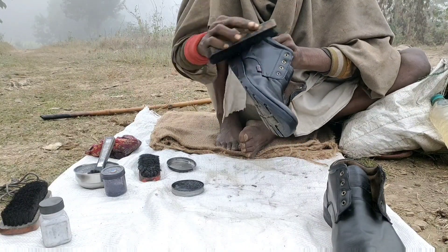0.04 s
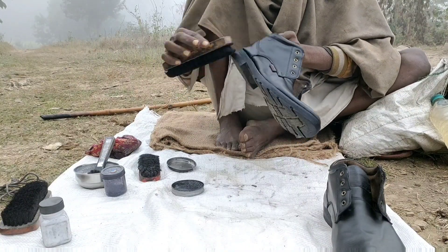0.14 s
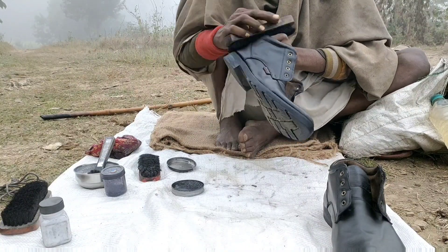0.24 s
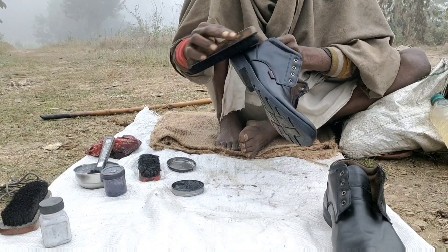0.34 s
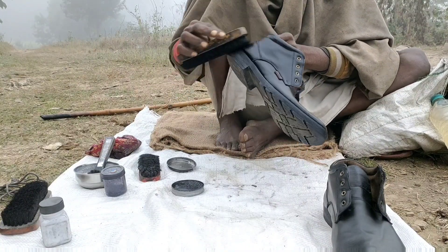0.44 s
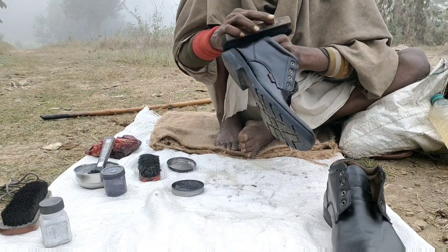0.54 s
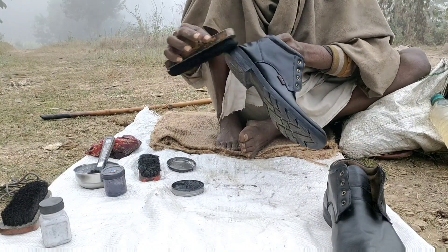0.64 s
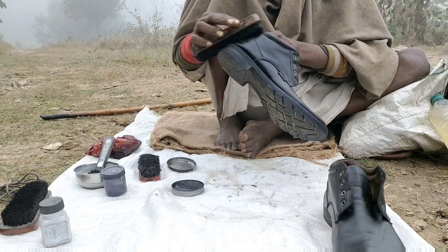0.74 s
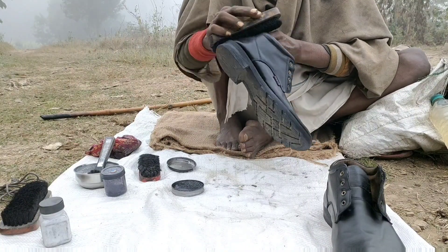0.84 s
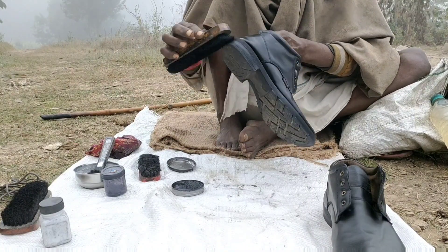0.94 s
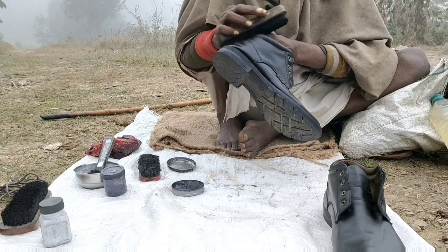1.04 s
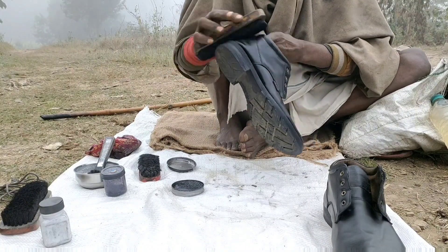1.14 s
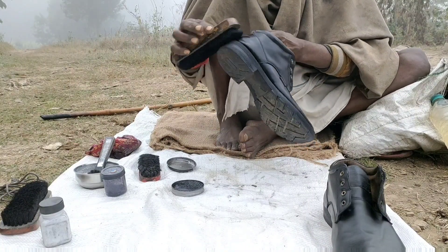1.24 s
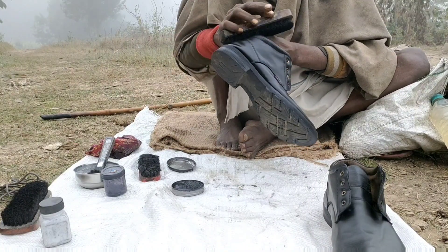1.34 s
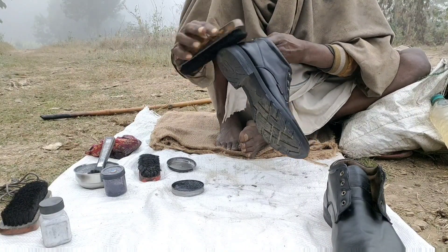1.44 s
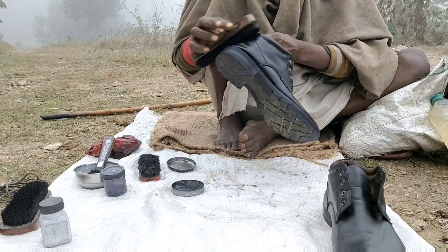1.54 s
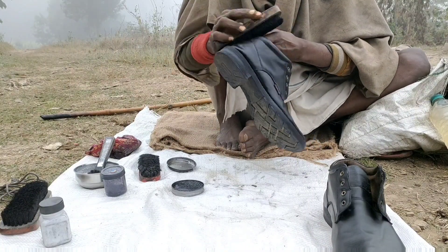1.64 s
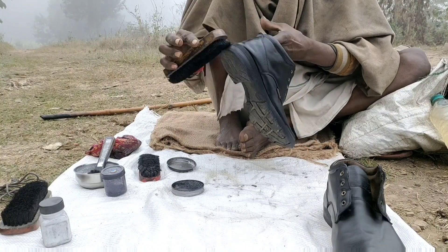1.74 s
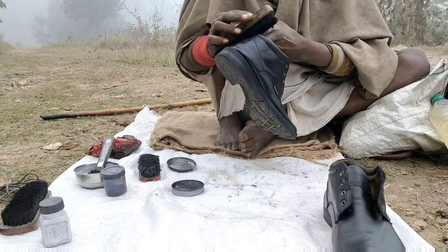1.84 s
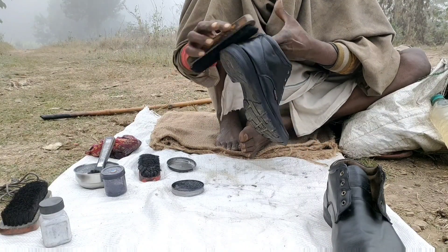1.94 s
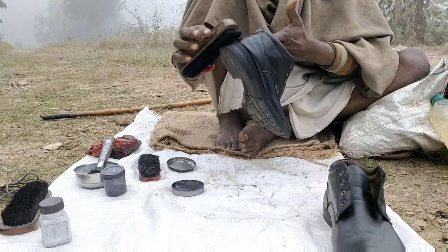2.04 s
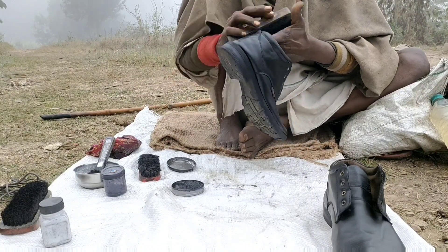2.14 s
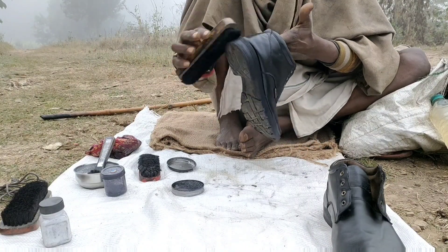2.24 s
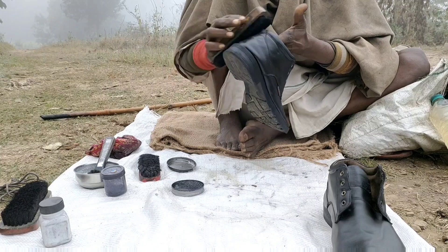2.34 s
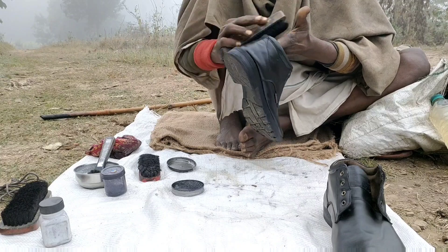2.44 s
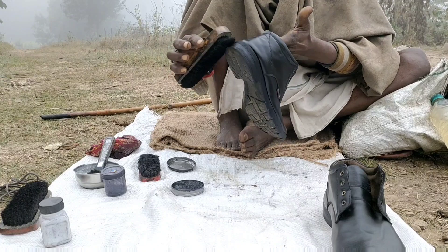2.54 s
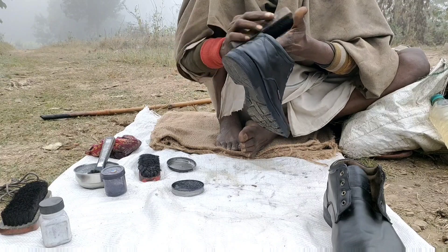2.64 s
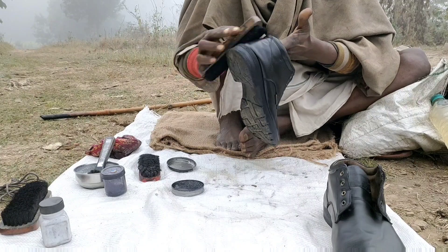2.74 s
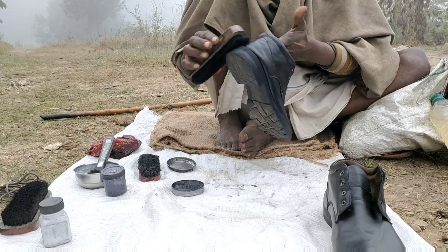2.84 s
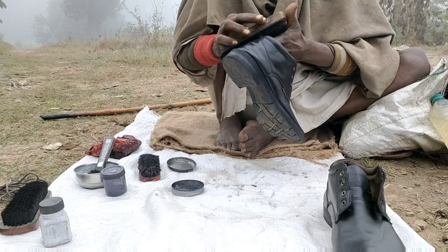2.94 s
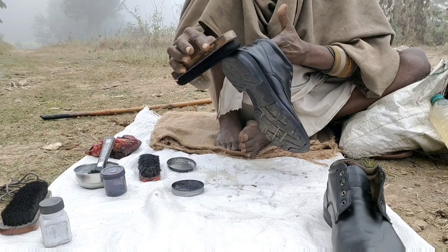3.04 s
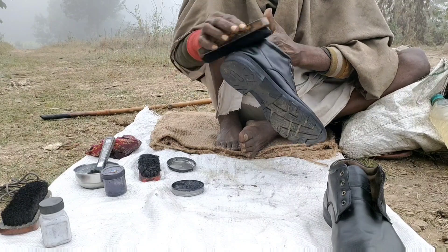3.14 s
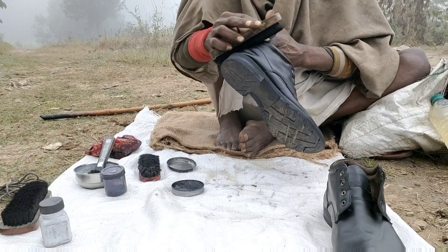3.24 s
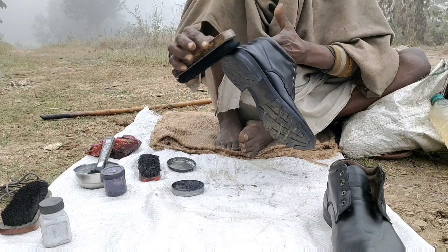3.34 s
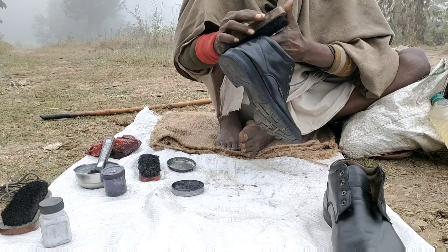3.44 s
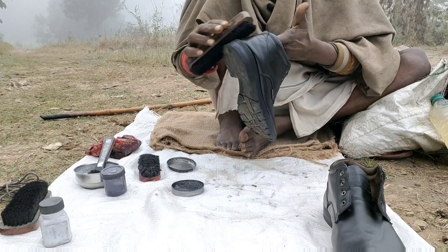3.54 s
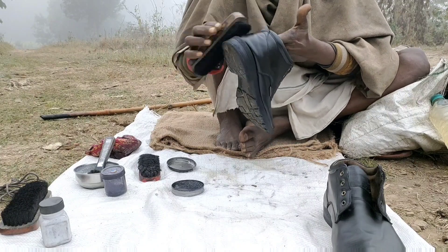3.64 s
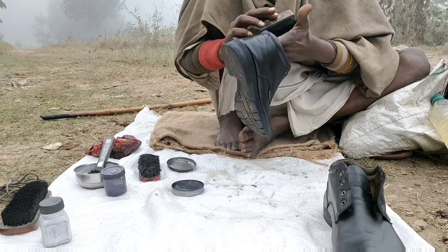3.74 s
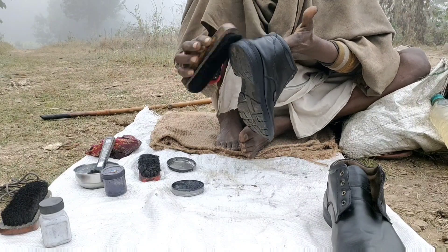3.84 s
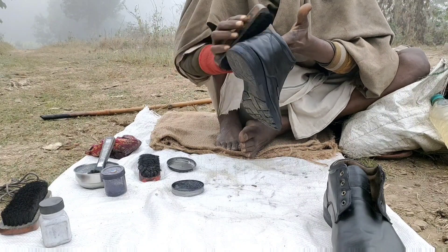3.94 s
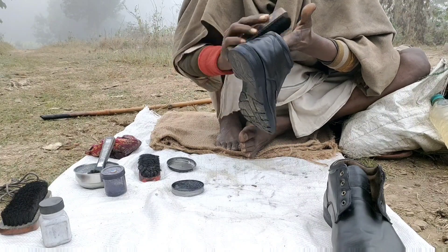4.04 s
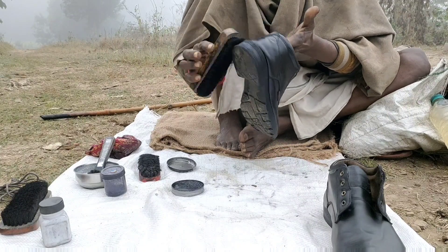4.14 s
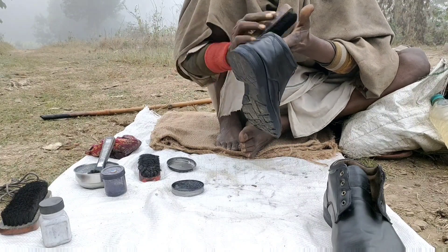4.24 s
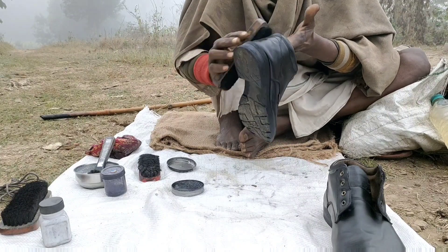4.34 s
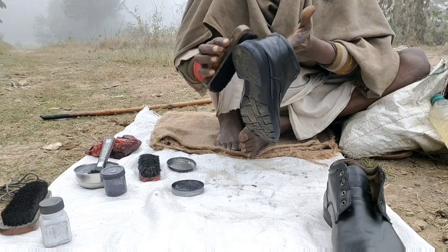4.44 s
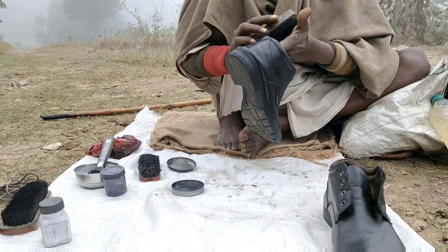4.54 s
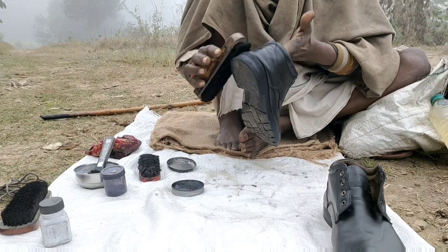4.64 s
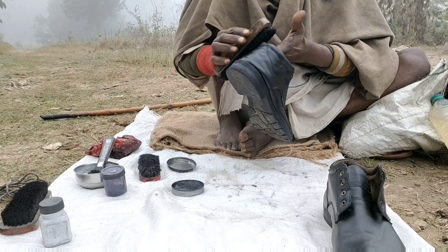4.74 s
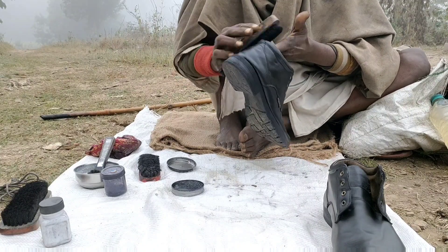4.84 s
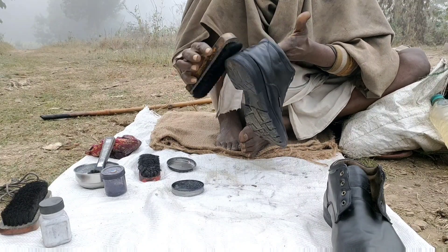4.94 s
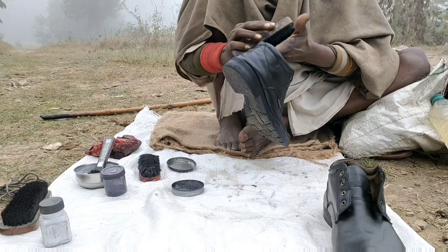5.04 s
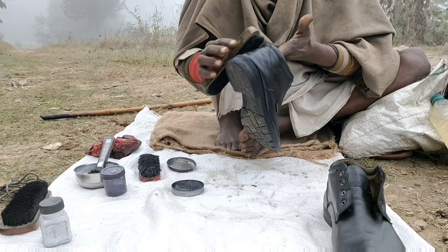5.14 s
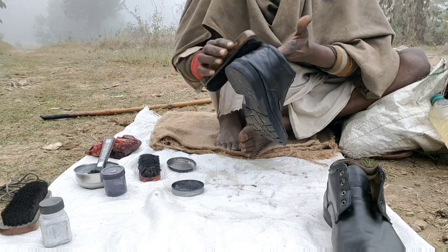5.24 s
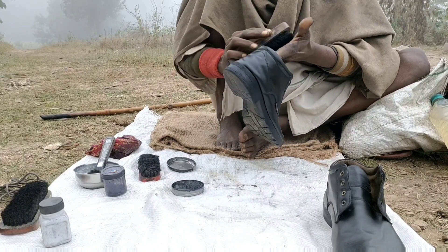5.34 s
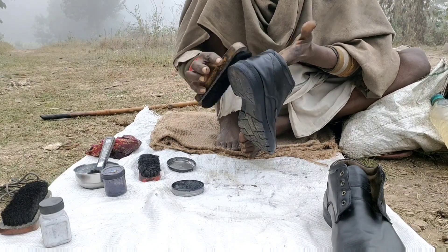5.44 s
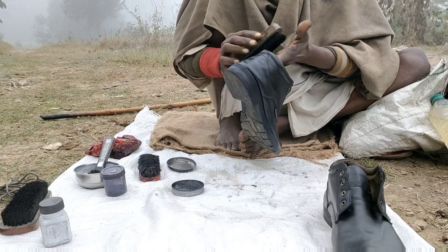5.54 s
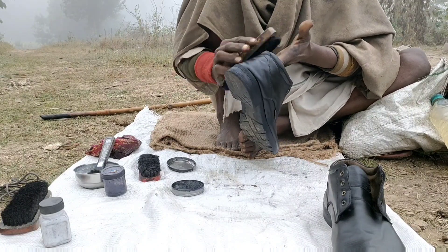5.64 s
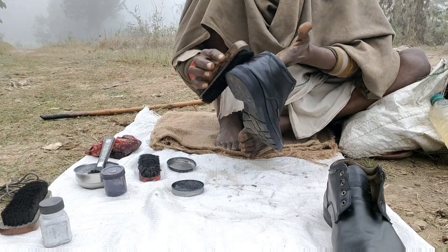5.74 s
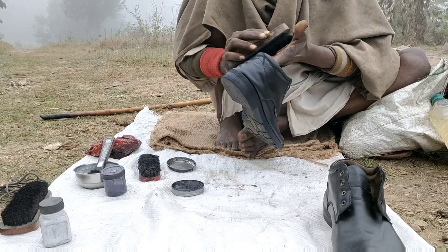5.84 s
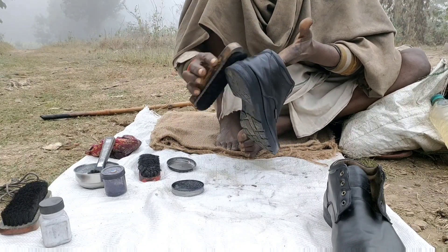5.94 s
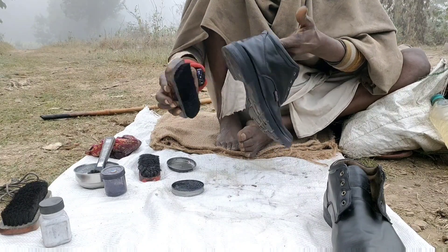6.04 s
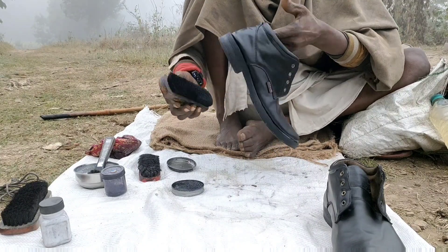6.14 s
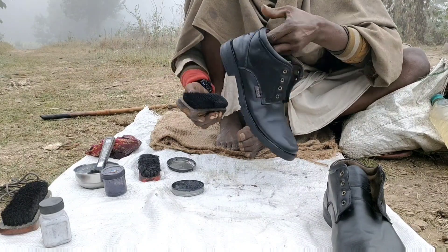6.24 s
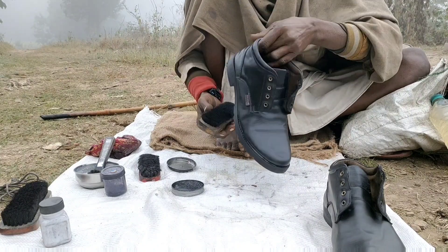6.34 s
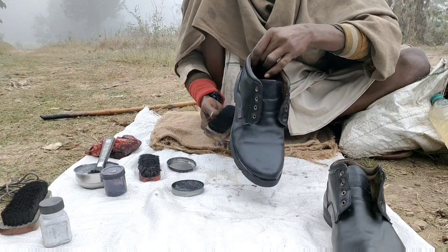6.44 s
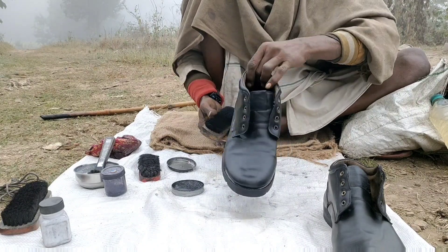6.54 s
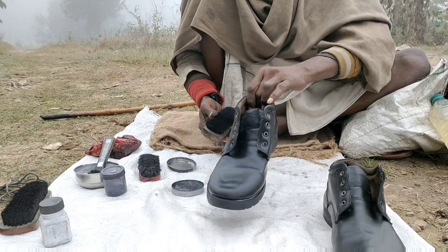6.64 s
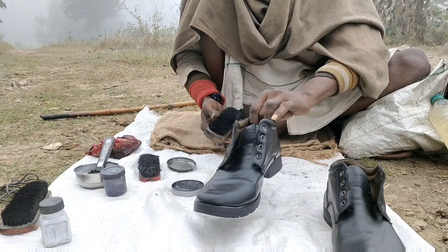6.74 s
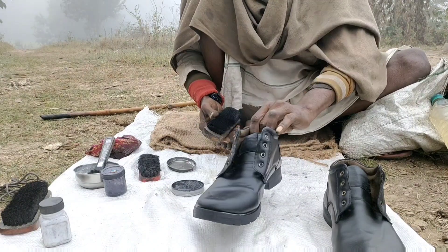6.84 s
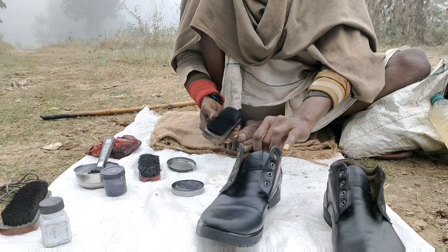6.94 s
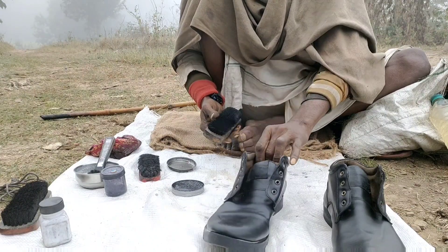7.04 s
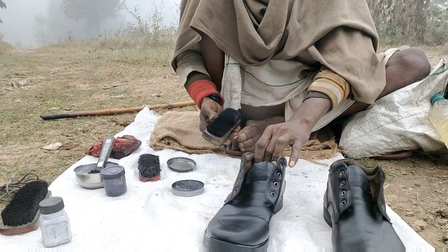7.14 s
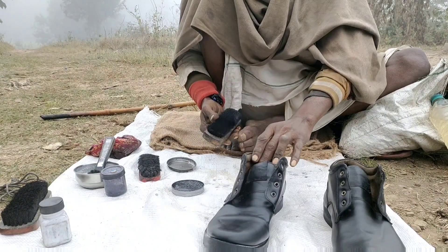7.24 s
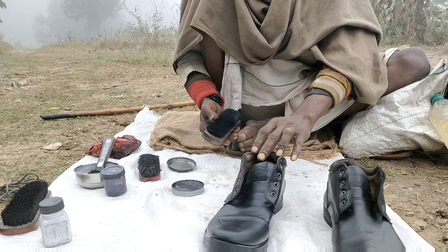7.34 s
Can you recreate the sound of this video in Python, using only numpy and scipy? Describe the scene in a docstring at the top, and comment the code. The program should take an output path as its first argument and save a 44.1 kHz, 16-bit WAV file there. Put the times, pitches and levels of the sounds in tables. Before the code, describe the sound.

A bristle brush buffs a leather boot with fast, hissing back-and-forth strokes outdoors, then stops; cloth rustles and the boot thuds softly onto the ground.

```python
"""A bristle brush buffs a leather boot outdoors with fast back-and-forth strokes, close to one microphone.
Hiss follows the speed of the hand, and resonances of the hollow boot colour it; low noise thrums below it
and short low tones bump softly. Rustling noise is a sleeve, short scuffs are sole, laces and fingers, and
fading tones are the heel set down on soil. Behind lie soft air noise, a wavering engine hum and bird notes."""
import sys
import numpy as np
from scipy import signal
from scipy.fft import rfft, irfft, next_fast_len
from scipy.io import wavfile
from scipy.ndimage import uniform_filter1d, map_coordinates

SR = 44100
rng = np.random.default_rng(int(sys.argv[2]) if len(sys.argv) > 2 else 0)


def wrap_up_sound(samples):
    """Save the sound to the file named by the first command line argument, as 16-bit audio."""
    columns = np.atleast_2d(samples).T
    # keep every value between -1 and 1, then stretch to whole-number steps
    tamed = np.clip(columns, -1, 1)
    steps = np.round(tamed * 32767).astype(np.int16)
    wavfile.write(sys.argv[1], SR, steps)


N = 326340

# The strokes of the hand, pull and push in turn, starting with a pull.
# Each row: start in seconds, basic level of the rub in dB, place of the fastest moment (0-1 of the stroke).
STROKES = [(-.075, -43, 0.16), (.065, -36.5, 0.51), (0.193, -41, 0.3), (.372, -35, 0.31),
           (0.465, -41.5, 0.27), (.613, -37, 0.47), (.74, -42.5, 0.31), (.896, -36, 0.43),
           (1.014, -41, .26), (1.164, -36.5, .51), (1.278, -40, 0.36), (1.428, -36, 0.43),
           (1.551, -40.5, 0.36), (1.698, -35.5, 0.5), (1.815, -40.5, .36), (1.961, -36, 0.49),
           (2.08, -42, 0.22), (2.219, -35, 0.57), (2.344, -40.5, .28), (2.489, -35.5, 0.48),
           (2.604, -38.5, .36), (2.75, -36.5, 0.46), (2.872, -39, 0.36), (3.017, -38.3, 0.53),
           (3.135, -41.5, 0.37), (3.282, -39, 0.44), (3.411, -41.5, 0.5), (3.544, -37, 0.57),
           (3.667, -40.5, 0.31), (3.807, -37.5, 0.57), (3.937, -40, .34), (4.081, -37, .48),
           (4.206, -38, .39), (4.345, -38, 0.43), (4.47, -39, 0.39), (4.613, -39.8, 0.37),
           (4.738, -40, 0.42), (4.88, -38.5, 0.43), (5.004, -40, .39), (5.14, -39, .38), (5.27, -41, 0.49),
           (5.402, -40, 0.34), (5.533, -42.3, 0.57), (5.668, -41.5, 0.3), (5.794, -41, 0.64),
           (5.928, -40.5, .37), (6.053, -40, 0.37)]
LIFT_S = 6.2  # the brush leaves the boot


def gain(db):
    """Turn decibels into a factor for loudness."""
    return 10 ** (np.asarray(db) / 20)


def unit(x):
    """Scale a signal to an average strength (rms) of 1."""
    return x / np.sqrt(np.mean(x ** 2) + 1e-20)


def clock():
    """Give the time of every sample in seconds."""
    return np.arange(N) / SR


def wobble(rate):
    """Draw a smooth random curve through `rate` random points a second."""
    points = rng.standard_normal(int(N * rate / SR) + 4)
    return map_coordinates(points, [np.arange(N) * rate / SR])


def filtered(x, response):
    """Make each frequency of x stronger or weaker, as response(Hz) tells."""
    size = next_fast_len(N + 8192)  # spare room keeps the end from wrapping onto the start
    hz = np.fft.rfftfreq(size, 1 / SR)
    return irfft(rfft(x, size) * response(hz), size)[..., :N]


def noise(colour, patchy_db):
    """Make noise of rms 1 with a given colour, whose narrow peaks and dips wander from moment to moment."""
    grid = signal.stft(rng.standard_normal(N), nperseg=512)[2]
    patches = rng.standard_normal(grid.shape)
    patches = uniform_filter1d(patches, size=4, axis=0)  # blur over frequency
    patches = uniform_filter1d(patches, size=14, axis=1)  # blur over time
    patchy = signal.istft(grid * gain(patchy_db * unit(patches)), nperseg=512)[1][:N]
    hz, db = np.transpose(colour)
    return unit(filtered(patchy, lambda f: gain(np.interp(np.log(f + 1), np.log(hz), db))))


def resonance(hz, width_hz):
    """Make noise of rms 1 around one pitch, as from a ringing hollow; the pitch may glide."""
    white = rng.standard_normal((2, N))
    a, b = filtered(white, lambda f: 1 / (1 + (f / width_hz) ** 2))
    phase = 2 * np.pi * np.cumsum(hz * np.ones(N)) / SR
    return unit(a * np.cos(phase) + b * np.sin(phase))


def swell(s, half_length):
    """Rise and fall like a bell around time s."""
    return np.exp(-np.minimum(((clock() - s) / half_length) ** 2, 50))


def curves(rows):
    """Draw a line through each column after the time, one value per sample."""
    s, *columns = np.transpose(rows)
    return [np.interp(clock(), s, column) for column in columns]


def by_direction(pair):
    """Give every stroke the value of its direction, from a (pull, push) pair."""
    return np.resize(pair, len(STROKES))


def current_stroke():
    """Tell for every sample which stroke is under way."""
    start = np.transpose(STROKES)[0]
    return np.maximum(np.searchsorted(start, clock(), side="right") - 1, 0)


def per_stroke(values):
    """Hold one value through each stroke, gliding over at the turns."""
    return uniform_filter1d(np.asarray(values)[current_stroke()], size=441)


def brush(hollow_db=-0.45, sizzle_db=0.0, grip_db=1.34, early_db=5.0, bright=1.07, dull=0.91, late_db=1.0):
    """Thousands of bristles slip on the leather; their noise follows the speed of the hand."""
    # Hiss of the bristles. Each row: frequency in Hz, relative level in dB.
    hiss_colour = [(900, -31), (1500, -14.5), (1900, -7), (2250, -1.5), (2700, 1.5), (3400, 1), (4100, 0),
                   (4800, 0.6), (6000, -5), (7000, -8.5), (9000, -35), (12000, -60)]
    # Sizzle of the bristle tips. Each row: frequency in Hz, relative level in dB.
    sizzle_colour = [(3500, -45), (5500, -3), (6800, -0.5), (7700, -0.5), (9000, -3), (10500, -5.5),
                     (12500, -10), (15500, -17.5)]
    # Offsets of the tips' sizzle and the low scrape. Each row: time in seconds, sizzle in dB, scrape in dB.
    grain = [(0, -0.5, 5), (1.1, -2, 2), (2.1, -1.9, -4), (2.7, -4, 2), (3.3, -2, -5), (4.1, -5, 4),
             (5.3, -4, 5), (5.9, -5, 0), (6.18, -4.5, 2)]
    # Colour of the stroke in dB: (pull, push).
    stroke_hollow_db, stroke_sizzle_db = (-6.5, -8.5), (.6, -0.26)

    peak_db = np.transpose(STROKES)[1]
    k = current_stroke()
    along, crest = stroke_progress()
    sweep = hand_sweep(along, crest)
    # Divide by the stroke's level, which comes back below, so turns and catches keep their own.
    turning, catching = turn_flip() / gain(peak_db[k]), catches() / gain(peak_db[k])
    rub = np.sqrt(sweep ** 2 + turning ** 2 + catching ** 2)
    # Seams and creases make the grip uneven.
    level = gain(peak_db[k] + grip_db * wobble(90))
    hiss = rub * noise(hiss_colour, patchy_db=2.5)

    # Fast tips sizzle more, and late in a stroke.
    grain_db, scrape_db = curves(grain)
    tips_db = sizzle_db + grain_db + per_stroke(by_direction(stroke_sizzle_db))
    tips_db = tips_db + late_db * (along - crest) + 0.21 * wobble(60)
    tips = gain(tips_db) * rub ** bright * noise(sizzle_colour, patchy_db=0.7)

    # The boot's hollow answers most early in a stroke, while the tufts first bite.
    boot_db = hollow_db + per_stroke(by_direction(stroke_hollow_db))
    boot_db = boot_db + early_db * (crest - along) + 1.7 * wobble(60)
    boot = gain(boot_db) * rub ** dull * cavity()
    return level * (hiss + tips + boot + gain(scrape_db) * drag(rub))


def stroke_progress(longest_s=0.1421):
    """Follow the hand from 0 to 1 through each stroke; if the next turn comes later, the hand waits."""
    start, _, crest = np.transpose(STROKES)
    k = current_stroke()
    length = np.minimum(np.diff(np.append(start, LIFT_S)), longest_s)
    along = np.clip((clock() - start[k]) / length[k], 0, 1)
    return along, np.clip(crest[k], .05, .95)


def hand_sweep(along, crest):
    """The hand speeds up to the crest of the stroke and slows to a stop at the turn."""
    # How steeply the rub follows the speed: (pull, push).
    rise_power, fall_power = (2.01, 2.18), (1.6, 1.5)
    k = current_stroke()
    ramp = np.minimum(along / crest, (1 - along) / (1 - crest))
    speed = np.sin(np.pi / 2 * np.clip(ramp, 0, 1))
    return speed ** np.where(along < crest, by_direction(rise_power)[k], by_direction(fall_power)[k])


def turn_flip(lift_db=-82.0):
    """At the turn the bent bristles still flip over, until the brush is lifted away."""
    # The brush stays on the leather before a pull and almost leaves it before a push.
    # Each row: time in seconds, level at the turn before a pull in dB, before a push in dB.
    turn_levels = [(0, -59, -76), (.45, -56.5, -74), (.8, -62, -64), (1.8, -63.5, -69.5), (2.4, -52.5, -77),
                   (3.3, -61, -76), (4.4, -55.5, -73.5), (5.2, -62, -67), (6, -64, -68)]
    start = np.transpose(STROKES)[0]
    s, *before = np.transpose(turn_levels)
    direction = np.arange(len(start)) % 2  # 0 is a pull, 1 a push
    turn_db = np.choose(direction, [np.interp(start, s, db) for db in before])
    level_db = np.interp(clock(), np.append(start, LIFT_S), np.append(turn_db, lift_db))
    return gain(level_db) * (clock() < LIFT_S)


def catches(attack_s=0.0017, t60=0.095):
    """The tufts strike the edge of the heel: a sudden rush that falls by 60 dB in t60 seconds."""
    # Each row: time in seconds, level in dB ahead of the attack and fade.
    strikes = [(.382, -34), (.916, -39.5), (1.304, -40), (1.453, -36), (1.72, -39), (1.841, -48),
               (2.518, -43), (2.549, -37), (3.051, -39.5), (3.309, -42), (3.565, -46), (3.577, -35.5),
               (3.692, -42), (3.825, -46), (3.957, -47), (4.108, -44), (4.361, -46), (4.903, -50),
               (5.169, -41), (5.683, -47)]
    level = np.zeros(N)
    t = np.arange(SR // 8) / SR
    for s, db in strikes:
        level[round(s * SR):][:len(t)] += gain(db - 60 * t / t60) * (1 - np.exp(-t / attack_s))
    return level


def cavity(shell_db=-2.0, low_hz=490.8, low_width_hz=147.0, high_width_hz=168.0):
    """The leather shell answers broadly, and two air resonances ring inside the boot."""
    # Answer of the shell. Each row: frequency in Hz, relative level in dB.
    shell_colour = [(150, -3), (260, 0), (380, -8.5), (650, -7), (860, -7.5), (1250, -1), (1550, -1),
                    (1850, -3), (2400, -9), (4000, -50)]
    # The resonances come and go as the boot's opening is turned.
    # Each row: time in seconds, low resonance in dB, high resonance in dB.
    opening = [(0, -2, -6.5), (.55, -11.5, -16.5), (1.25, -6.5, -5.5), (1.8, -10.5, -5.5),
               (2.5, -6.5, -5.5), (3.3, -10.5, -5.5), (4.2, -11.5, -8.5), (5.3, -9.5, -2.5),
               (5.9, -20, -4.5)]
    # The high resonance climbs as the boot is tilted. Each row: time in seconds, pitch in Hz.
    opening_pitch = [(0, 845), (4.3, 914.8), (5.8, 1006)]
    low_db, high_db = curves(opening)
    high_hz, = curves(opening_pitch)
    shell = gain(shell_db) * noise(shell_colour, patchy_db=3.0)
    low = gain(low_db) * resonance(low_hz, low_width_hz)
    high = gain(high_db) * resonance(high_hz, high_width_hz)
    return shell + low + high


def drag(rub, drag_db=-21.0, drag_hz=1673.0, width_hz=490.0, wander=.15, power=0.65):
    """Tufts that creep slowly over the leather give a lower scrape, which stands out near the turns."""
    pitch = drag_hz * np.exp(wander * wobble(12))
    return gain(drag_db + 2.7 * wobble(17)) * rub ** power * resonance(pitch, width_hz)


def thrum(thrum_db=0.15, settle_s=0.21, lumpy_db=4.0):
    """The dragging brush shakes the leather shell and the arms that hold it; they settle when it stops."""
    # Low noise of the shaking. Each row: frequency in Hz, relative level in dB.
    thrum_colour = [(15, -41), (30, -15), (50, -2), (85, 2), (130, 0), (180, -5), (230, -9), (300, -17.5),
                    (420, -24.5), (900, -40)]
    # Strength of the shaking before lumps and settling. Each row: time in seconds, basic level in dB.
    shake = [(0, -55), (.28, -51), (.5, -56), (.7, -54), (1.05, -57), (1.6, -58.5), (1.88, -51.5),
             (2.1, -59.5), (2.55, -50.5), (3.05, -57.5), (3.55, -56.5), (3.95, -61), (4.15, -52),
             (4.4, -57), (4.9, -57), (5.5, -58), (6.2, -61.5)]
    settling = np.exp(-np.maximum(clock() - LIFT_S, 0) / settle_s)
    level_db = thrum_db + curves(shake)[0] + lumpy_db * wobble(32)
    return gain(level_db) * settling * noise(thrum_colour, patchy_db=2.0)


def bumps(overtone_db=-12.5, overtone=2.02):
    """Limp leather, rocked in the hand, gives a couple of low swings per bump with a brief overtone."""
    # Each row: middle of the bump in seconds, basic level in dB, pitch in Hz.
    bump_list = [(0.076, -40.5, 130), (.097, -44, 110), (.285, -32, 105), (0.313, -41, 115),
                 (0.339, -44, 150), (.351, -34.5, 150), (.364, -43, 125), (0.382, -34.5, 143),
                 (0.529, -40, 115), (1.169, -39, 146), (1.185, -38, 100), (1.656, -39, 111),
                 (1.835, -42, 90), (2.173, -39, 136), (2.187, -33.5, 106), (2.249, -35.5, 121),
                 (2.442, -33.5, 126), (2.705, -37, 103), (2.725, -40, 100), (2.978, -38.5, 104),
                 (3.08, -37.5, 155), (3.15, -37.5, 108), (3.511, -33, 129), (4.025, -36, 93),
                 (4.039, -39.5, 121), (4.282, -34.5, 101), (4.73, -38, 89), (5.364, -38, 133),
                 (5.479, -35.5, 132), (5.53, -36, 142.5)]
    out = np.zeros(N)
    half = SR // 20
    t = np.arange(-half, half) / SR
    for s, db, hz in bump_list:
        phase = rng.uniform(0, 2 * np.pi)
        swings = np.sin(2 * np.pi * hz * t)
        swings += gain(overtone_db) * np.sin(2 * np.pi * overtone * hz * t + phase)
        fade = 1 / np.cosh(2.3 * hz * t)
        out[round(s * SR) - half:][:len(t)] += gain(db + 1) * swings * fade
    return out


def handling():
    """A sleeve rustles while the boot is turned; sole, laces and fingers scuff lightly."""
    # Sleeve rustle. Each row: frequency in Hz, relative level in dB.
    rustle_colour = [(100, -1.5), (400, 3.5), (1200, 1), (2200, 1), (3700, 1), (6500, -6), (9000, -12),
                     (15000, -29)]
    # Strength of the rustle before its wobble. Each row: time in seconds, level in dB.
    cloth = [(6.1, -92), (6.2, -69.5), (6.32, -73), (6.4, -69.5), (6.49, -73.5), (6.61, -69), (6.655, -85),
             (7.13, -78.5), (7.4, -84)]
    # Gritty scuffs. Each row: frequency in Hz, relative level in dB.
    scrape_colour = [(200, 8), (900, -8), (3500, -2.5), (7000, -3.5), (10000, -15), (15000, -28.5)]
    # Each row: middle of the scuff in seconds, level there in dB, half length in seconds.
    scuffs = [(6.238, -60, 0.0024), (7.185, -58, 0.011), (7.194, -54, 0.0064), (7.206, -58, 0.0071),
              (7.224, -64, 0.013), (7.275, -64, .003), (7.286, -63, 0.0072), (7.298, -58, 0.0055),
              (7.353, -69, 0.0066), (7.377, -68, .0015)]
    sleeve = gain(curves(cloth)[0] + 1.4 * wobble(40)) * noise(rustle_colour, patchy_db=-0.5)
    touches = sum(gain(db) * swell(s, half) for s, db, half in scuffs)
    grit = unit(gain(3 * wobble(900)) * noise(scrape_colour, patchy_db=1))
    return sleeve + touches * grit


def landing(landing_s=7.1945):
    """The rubber heel thuds on the soil, which damps its tones at once."""
    # Tones of the thud. Each row: pitch in Hz, starting level before the bass cut in dB,
    # time to fall by 60 dB in seconds.
    sole_tones = [(125, -32, .038), (235, -28, .032), (470, -31, .015), (650, -32, .016),
                  (1140, -39.5, .013), (1880, -41, .013)]
    t = np.maximum(clock() - landing_s, 0)
    ring = np.zeros(N)
    for k, (hz, db, t60) in enumerate(sole_tones):
        fade = gain(db - np.minimum(60 * t / t60, 200))
        ring += (-1) ** k * fade * np.sin(2 * np.pi * hz * t)
    # A body as small as a boot radiates little deep bass.
    return signal.sosfilt(signal.butter(2, 110, "high", fs=SR, output="sos"), ring)


def field(air_db=-70.5, hum_db=-77.5, hum_hz=125.5):
    """Open country: soft air noise, a far engine's wavering tone and a few faint bird notes."""
    # Quiet air. Each row: frequency in Hz, relative level in dB.
    air_colour = [(20, -18), (45, -9), (70, 1), (110, 1), (160, -7.5), (230, -10), (600, -23.5),
                  (1500, -35), (2700, -26), (4000, -28.5), (4700, -23), (5300, -26.5), (6100, -21.5),
                  (7500, -31), (15500, -43)]
    # A far bird. Each row: middle of the note in seconds, level in dB, pitch in Hz.
    chirps = [(6.637, -80, 4720), (6.715, -76, 4730)]
    t = clock()
    air = gain(air_db) * noise(air_colour, patchy_db=3.5)
    hum_level = np.sqrt(2) * gain(hum_db + 3.5 * wobble(2.4))
    hum = hum_level * np.sin(2 * np.pi * hum_hz * t + 0.52 * wobble(8))
    bird = np.zeros(N)
    for s, db, hz in chirps:
        bird += gain(db) * swell(s, 0.016) * np.sin(2 * np.pi * hz * t + .6 * wobble(150))
    return air + hum + bird


def scene():
    """One microphone feeds both channels; the open air returns no echo."""
    mono = brush() + thrum() + bumps() + handling() + landing() + field()
    return np.array([mono, mono])


def record(dry, top_hz=15650):
    """The recorder keeps nothing above its highest frequency."""
    return filtered(dry, lambda hz: hz < top_hz)


dry = scene()
out = record(dry)
wrap_up_sound(out)
```